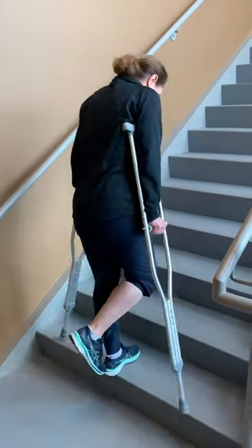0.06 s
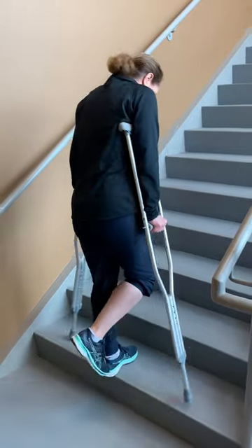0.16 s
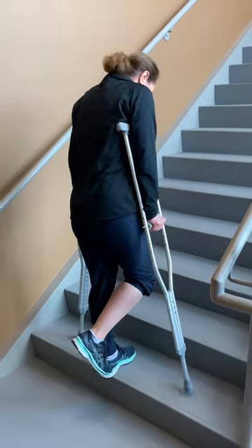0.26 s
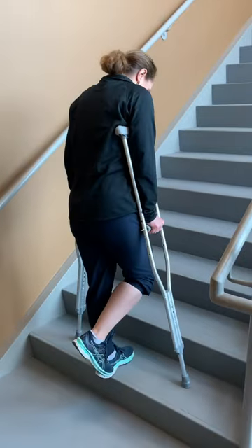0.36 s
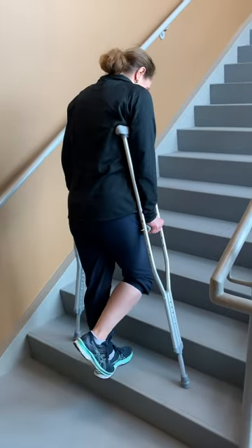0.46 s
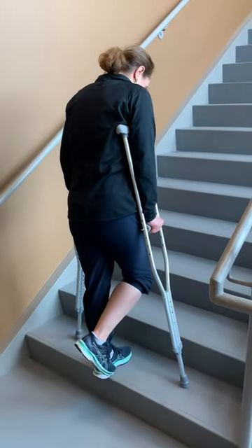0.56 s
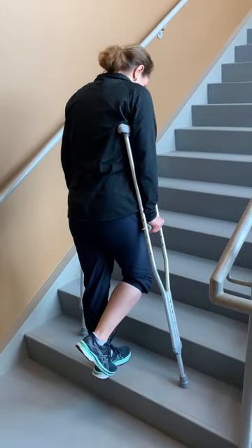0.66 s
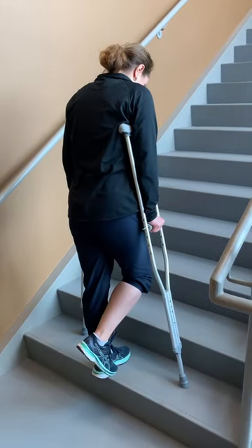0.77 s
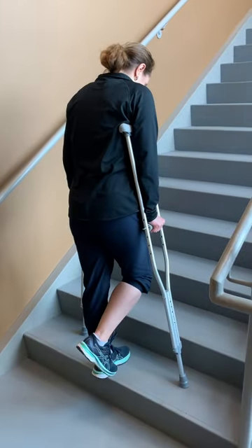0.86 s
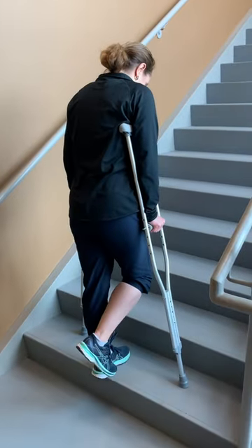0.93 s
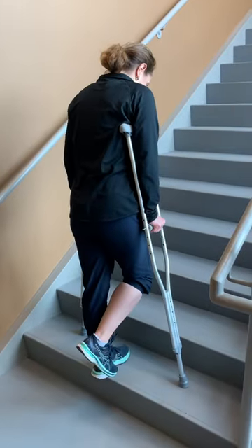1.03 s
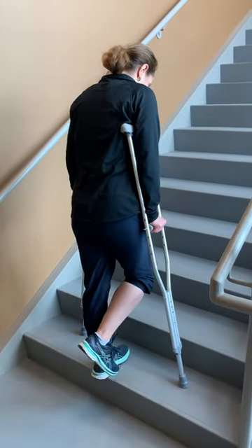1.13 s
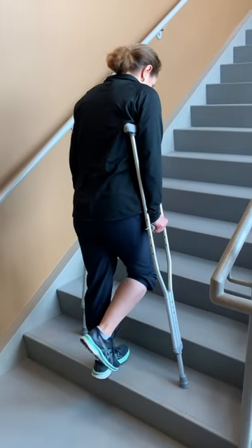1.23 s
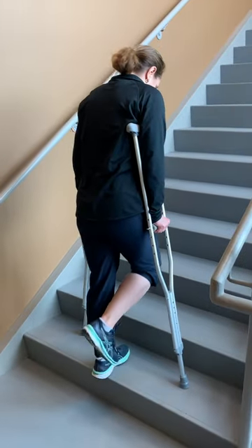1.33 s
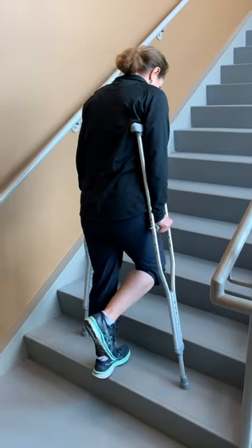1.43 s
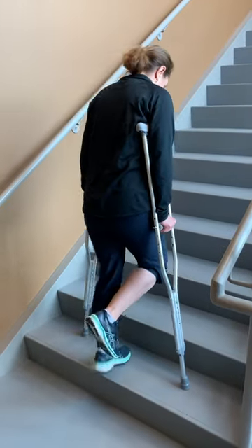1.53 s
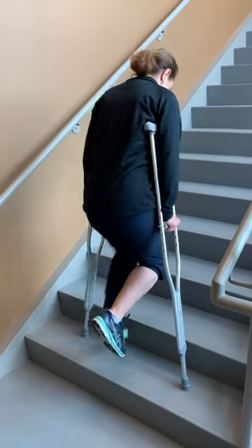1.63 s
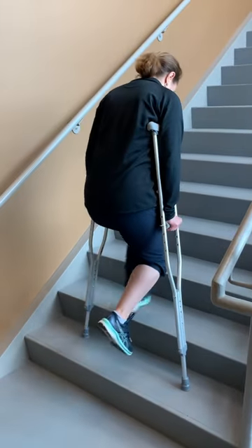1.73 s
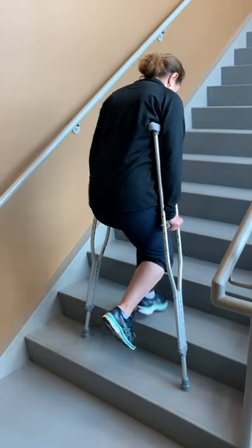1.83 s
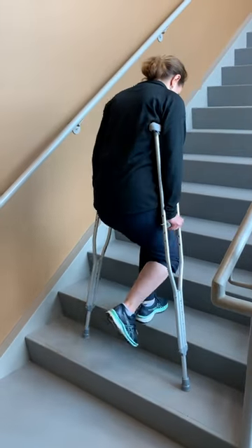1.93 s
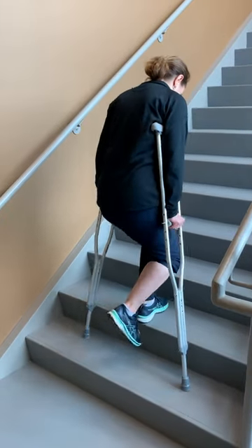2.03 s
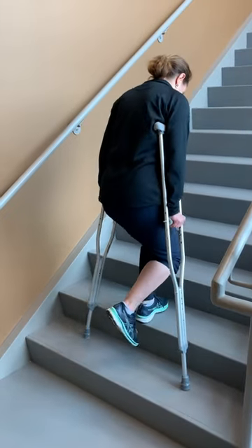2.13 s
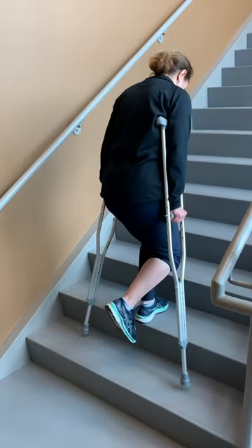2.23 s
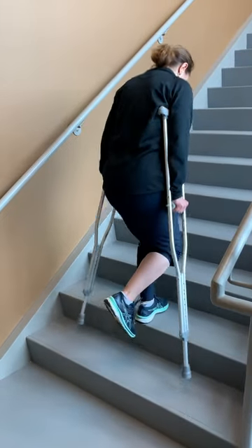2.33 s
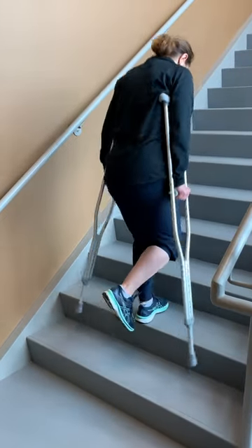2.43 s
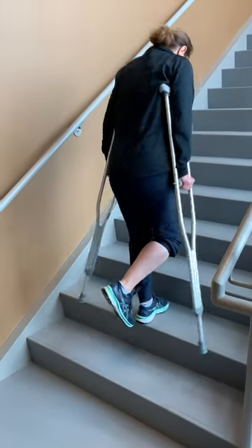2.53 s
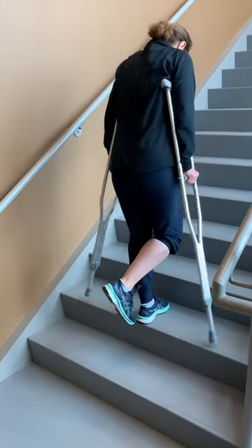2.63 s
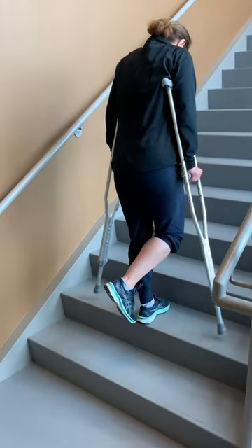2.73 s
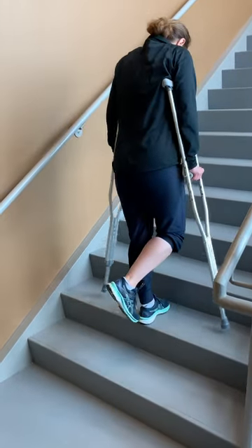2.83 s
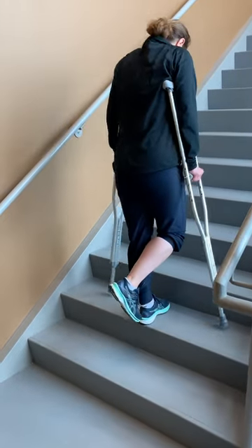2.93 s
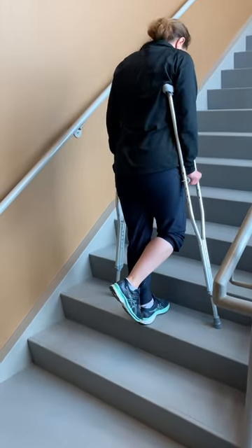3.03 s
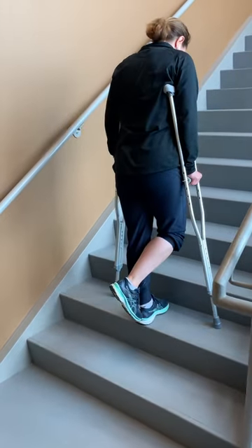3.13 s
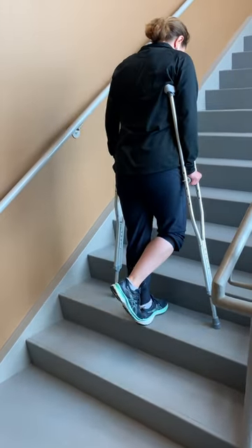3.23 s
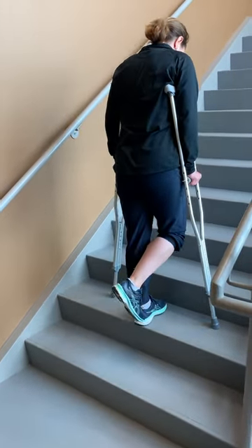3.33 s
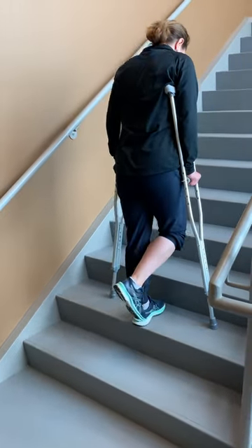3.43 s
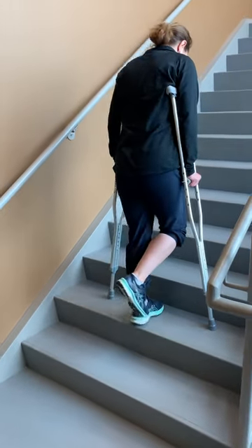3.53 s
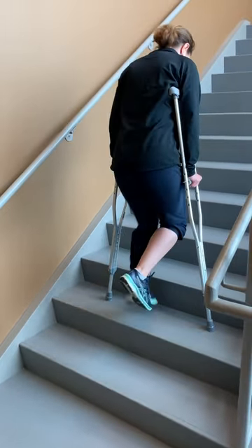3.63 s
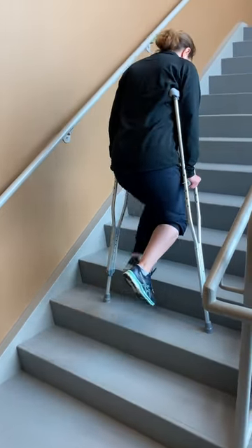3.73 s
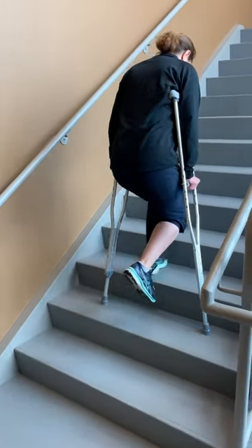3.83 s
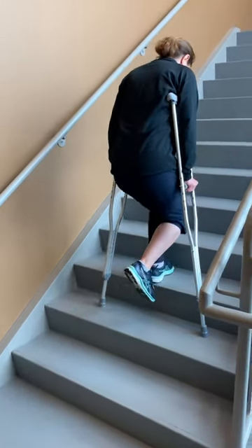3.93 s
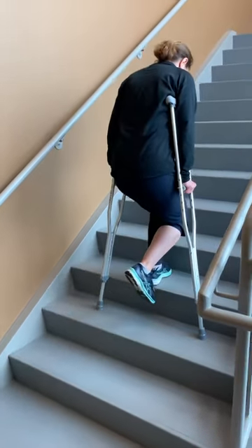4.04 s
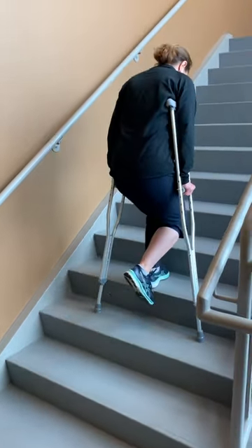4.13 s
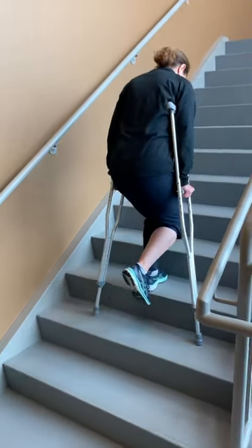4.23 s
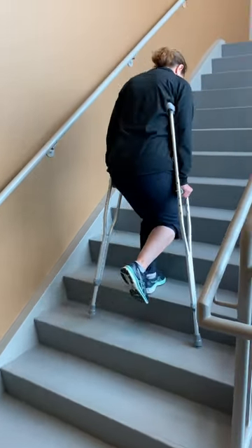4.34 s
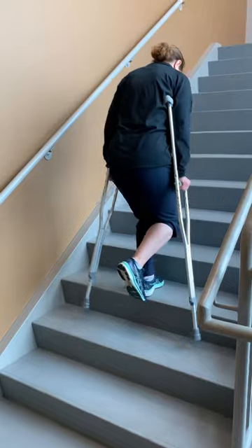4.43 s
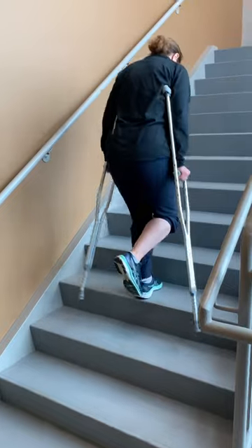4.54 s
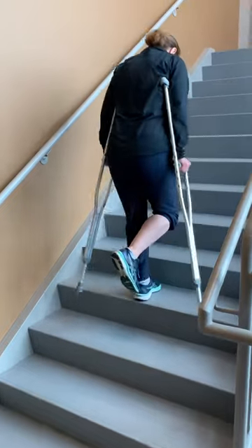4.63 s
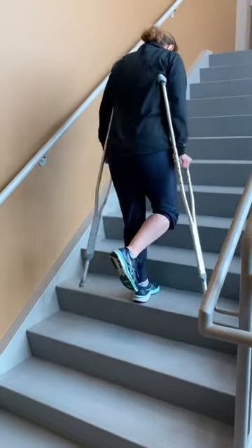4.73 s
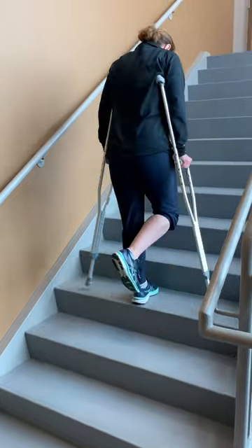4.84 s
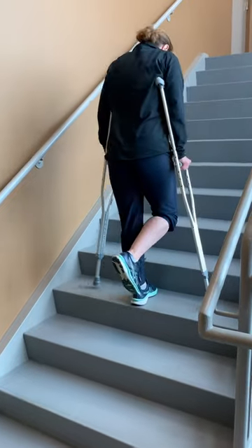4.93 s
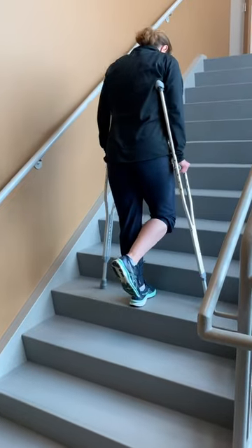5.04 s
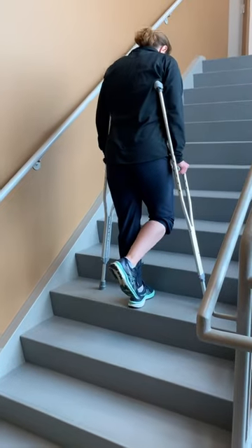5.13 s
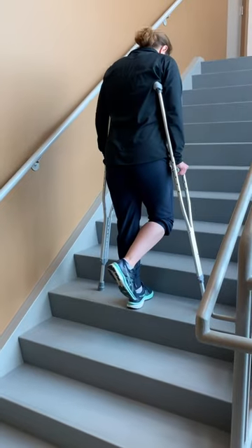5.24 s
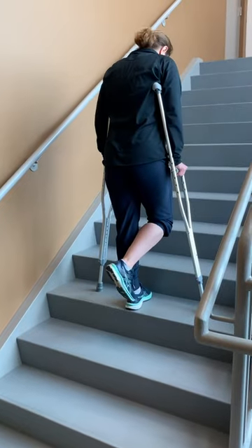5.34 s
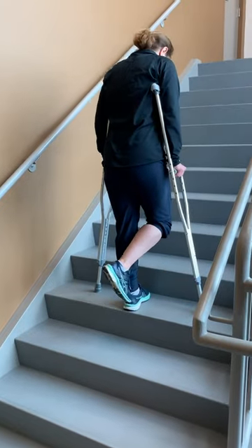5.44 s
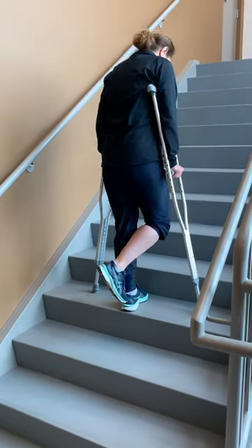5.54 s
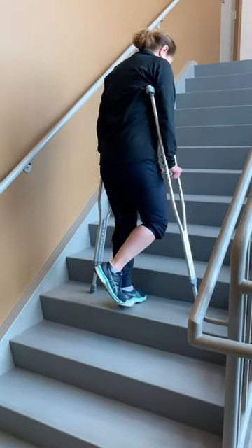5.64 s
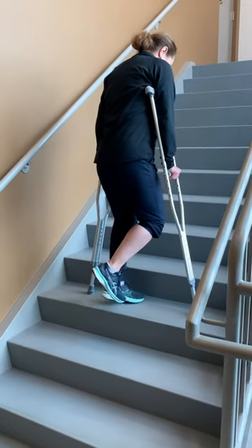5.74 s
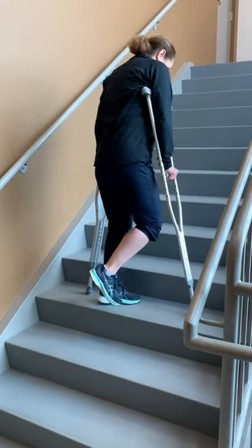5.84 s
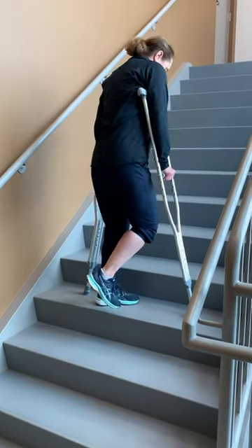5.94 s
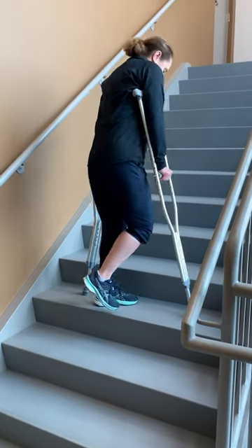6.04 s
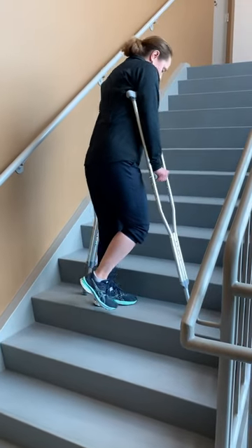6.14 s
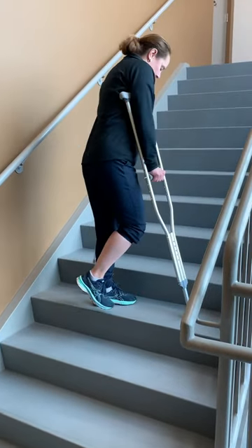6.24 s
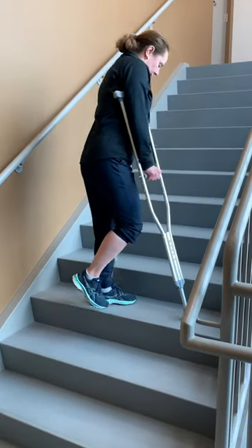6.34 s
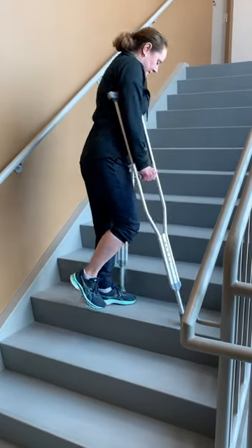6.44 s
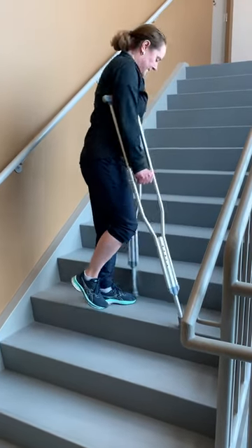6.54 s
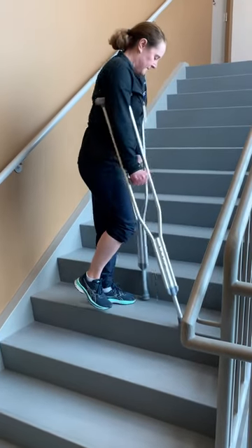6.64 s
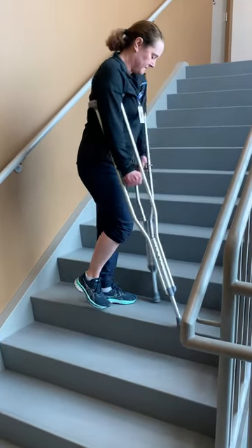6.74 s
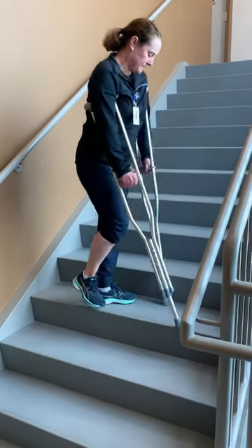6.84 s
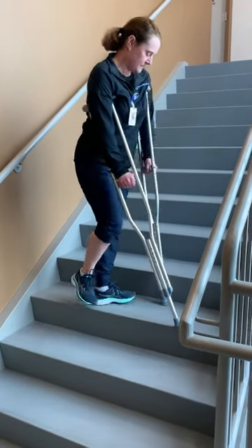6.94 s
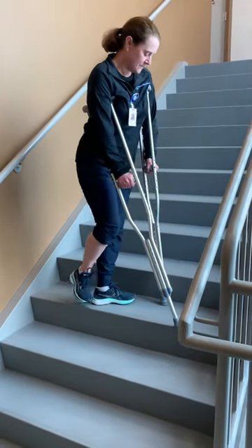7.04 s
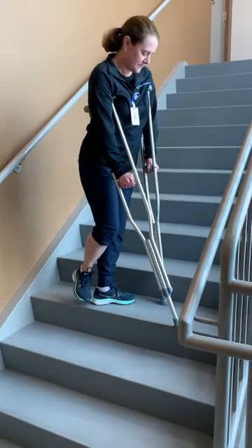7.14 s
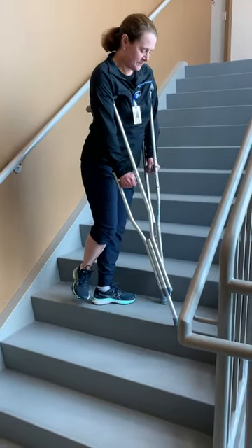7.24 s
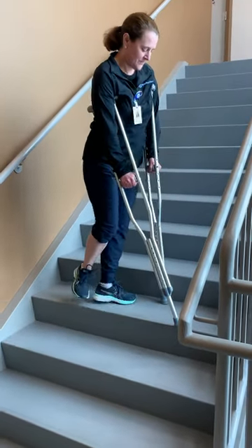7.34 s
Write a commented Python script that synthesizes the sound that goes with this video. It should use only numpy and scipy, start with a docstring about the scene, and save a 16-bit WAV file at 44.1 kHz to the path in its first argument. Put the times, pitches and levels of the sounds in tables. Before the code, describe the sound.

A bare, echoing indoor stairwell, heard in stereo from a few steps away. Low duct rumble, wavering fan hum and a very thin whine run throughout. At 0.25 to 0.37 seconds aluminium crutches plant with a bright double clack, tubes rattling and ringing over a knocked tread; small ticks follow until 0.7. After a quiet gap with a faint rub, a sneaker slaps down at 1.83 with a dull boom, and metal clicks follow to 2.16. Light rattles and a scuff come at 2.5, then a loud clack at 3.03. Another shoe slap and thud land at 3.9, clicks at 4.25, and the strongest sharp crutch clack at 5.04. Grainy rubber scrapes run from 5.5 to 5.75. A firm clack with a low tread thud and scrape hits at 6.35, smaller rattles follow to 6.83, and a soft scuff with a tiny tick ends it near 7.35.

```python
"""Metal clacks echo in a hard stairwell: a person climbs on two aluminium crutches, one step at a time.
The telescoping tubes click, rattle and ring as they are lifted, planted and loaded: noise bursts and sines.
Treads knock and boom under the weight; a sneaker slaps down, and rubber scrapes in grainy noise.
Behind it are the air noise and wavering tones of the ventilation, with a thin whine."""
import sys
import numpy as np
from scipy import signal
from scipy.fft import rfft, irfft, next_fast_len
from scipy.io import wavfile
from scipy.ndimage import map_coordinates

SR = 44100
rng = np.random.default_rng(int(sys.argv[2]) if len(sys.argv) > 2 else 0)


def wrap_up_sound(samples):
    """Save the sound to the file named by the first command line argument, as 16-bit audio."""
    columns = np.atleast_2d(samples).T
    # keep every value between -1 and 1, then stretch to whole-number steps
    tamed = np.clip(columns, -1, 1)
    steps = np.round(tamed * 32767).astype(np.int16)
    wavfile.write(sys.argv[1], SR, steps)


N = 325613


def crutches():
    """The pin clicks in its hole, the tubes rattle in each other and ring on, and the frame clanks."""
    # Clacks of the crutches: start_s, strength_db, then pin_click_db, tube_ring_db, frame_clank_db (added to
    # the strength, before the trims below), clank_pitch_hz, ring_pitch_hz, chatter_s, stairwell_db (added)
    clack_table = [(0.2494, -34.5, 8.5, -6, -1.5, 1500, 4400, 0.0027, 6),
                   (.361, -29, 16.5, -1.5, 1.5, 1540, 4250, 0.002, 0),
                   (.367, -29, 12, -7, -2, 1595, 4280, 0.0017, 3.5),
                   (.519, -51.5, 0, 0, 1, 1650, 4200, 0.0028, 3),
                   (.696, -42.5, 6.5, -4, 2, 1468, 4240, 0.0035, 2.5),
                   (.705, -46, 8, -14, 6, 1310, 4300, 0.0032, -2.5),
                   (1.2669, -53.5, 8, -21, 2.5, 1670, 4300, 0.0024, -8),
                   (1.4928, -59.5, 6, -6, 5.5, 1650, 4330, 0.0023, 2),
                   (1.527, -55.5, 12.5, -5, -2, 1670, 4100, 0.0038, 6),
                   (1.674, -56, 3, -9, 10, 1710, 4100, .003, 4),
                   (1.709, -47.5, 10.5, -9, -4, 1650, 4340, 0.0029, 0.5),
                   (1.8647, -42, 23, -20, 5.5, 1900, 4700, 0.0013, -1.5),
                   (1.9194, -35, 16.5, -13, -2.5, 1900, 4700, .0014, 0),
                   (2.1212, -50.5, -5, -5, -2, 1620, 4300, 0.0017, 3),
                   (2.139, -44, 14.5, 2, -5, 1620, 4370, 0.0022, -1.5),
                   (2.1574, -35.5, 19, -12.5, -9, 1655, 4630, .002, .5),
                   (2.5063, -56, 8, -9, -.5, 1620, 4300, 0.0016, 2),
                   (2.5312, -43.5, 3, -13, -0.5, 1540, 4300, 0.0039, 0.5),
                   (2.635, -60, -8, 3, -4.5, 1658, 4140, .0014, -5.5),
                   (3.0282, -28, 11, -6, -0.5, 1720, 4300, .003, -0.5),
                   (3.0356, -24.5, 16.5, -2, 4.5, 1710, 4350, .003, 1.5),
                   (3.496, -56.5, 5, -13, 8, 1620, 4300, .002, 6.5),
                   (3.7655, -65.5, 12.5, -14, 9, 1650, 4280, 0.0015, -7),
                   (4.2496, -39.5, 20.5, 1.5, -10, 1650, 4640, 0.0027, 1),
                   (4.3049, -43, 4.5, -1.5, -4.5, 1640, 4490, .003, 1),
                   (4.9878, -30.5, 14, -1.5, -3, 1620, 4180, 0.0017, 7.5),
                   (5.0426, -21.5, 14.5, -16, -2.5, 1880, 4400, 0.002, -0.5),
                   (5.5148, -59.5, 0.5, 9, 9.5, 1625, 4300, 0.0031, 10),
                   (6.089, -62.5, 6, -1.5, 5, 1660, 4340, 0.0018, 9.5),
                   (6.136, -51, -1.5, -4, -8, 1640, 4300, 0.0042, 4.5),
                   (6.2514, -48.5, -1.5, -3, -4, 1620, 4200, 0.0036, 4),
                   (6.3499, -27, 13, -2.5, 7, 1860, 4300, 0.0036, 3),
                   (6.5, -43.5, 13.5, -2, 1, 1900, 4300, 0.0028, 6.5),
                   (6.5254, -38.5, 6, 0.5, 4.5, 1610, 4230, 0.0057, 1.5),
                   (6.826, -39.5, 7, 5, 2.5, 1610, 4080, 0.0032, 2.5),
                   (7.3549, -55.5, 12, 4, 5, 1630, 4270, .003, 9)]
    # Pin in its hole: pitch_hz, relative_level_db
    click_spectrum = [(3000, -21), (6500, -9), (8000, 1), (9300, 1), (10500, -4), (12300, 0), (13500, 2.5),
                      (15200, -11.5), (16400, -28)]
    # Tubes rattling in each other: pitch_hz, relative_level_db
    rattle_spectrum = [(900, -28.5), (2000, -8.5), (3000, -3.5), (4200, 0.5), (5400, -3), (6900, -3.5),
                       (8500, -8.5), (13000, -26.5), (16000, -45)]
    # Ringing tubes: pitch_hz, relative_level_db, t60_s (time to fall by 60 dB)
    tube_modes = [(1182, -0.5, 0.19), (1660, -4, 0.3), (1858, 0, .2), (2330, -6.5, 0.38), (2700, -7.5, .15),
                  (4070, -2, .24), (4200, -6, .34), (4170, 0.5, 0.4), (4430, -3, 0.26), (4742, -9, .2),
                  (6500, -11.5, .12), (6960, -5, .14), (7900, -4, .12), (9600, -4.5, 0.12),
                  (10200, -7, .15), (10670, -1.5, 0.17), (12000, -5.5, 0.12)]
    # Crowded modes of the tube wall: multiple_of_ring_pitch, relative_level_db
    clink_spectrum = [(.6, -36.5), (.84, -17), (0.941, -4.5), (1, 0.5), (1.06, -1), (1.16, -13),
                      (1.3, -21.5), (1.6, -40)]
    # Clanking frame: multiple_of_clank_pitch, relative_level_db
    clank_spectrum = [(.12, -22.5), (0.302, -7.5), (0.481, -20), (0.621, -3.5), (.73, -3.5), (0.851, -4.5),
                      (1, 3.5), (1.16, -4), (1.3, -0.5), (1.55, -9.5), (1.9, -8.5), (3.5, -23.5)]
    usual_db = -38.5  # strength of an ordinary clack
    # A hard blow presses the tubes together, so the chatter stops sooner
    usual_damping_db_per_ms, damping_doubles_db = 3.5, 27.5

    out = np.zeros((2, N))
    for s, db, click_db, ring_db, clank_db, clank_hz, ring_hz, length, wet_db in clack_table:
        damping = usual_damping_db_per_ms * 2 ** ((db - usual_db) / damping_doubles_db)
        click = chatter(click_spectrum, damping, hold=length, rise=0.0023)
        click *= amp(db + click_db - 3.5)
        rattle = chatter(rattle_spectrum, damping, hold=length + 0.00017, rise=0.0055)
        rattle *= amp(db + 3.5)
        tubes = amp(db + ring_db - 23) * ring(tube_modes, detune=0.0022, attack=0.001)
        clink_hz = [(k * ring_hz, level) for k, level in clink_spectrum]
        clink = amp(db + ring_db - 4) * chatter(clink_hz, damping=1.1, hold=0.0045, rise=0.0021)
        clank_bands = [(k * clank_hz, level) for k, level in clank_spectrum]
        clank = amp(db + clank_db) * chatter(clank_bands, damping=2.18, hold=length, rise=0.0029)
        clack = click + rattle + clink + clank
        add(out, s, stairwell(clack + tubes, all_round(clack) + tubes, wet_db, near_db=2.0))
    return out


def treads():
    """Weight lands, then settles; each stage knocks a tread, sets it drumming and makes the flight boom."""
    # Rubber tips and the foot load the treads: start_s, boom_db, drum_db, drum_pitch_hz, knock_db,
    # knock_pitch_hz (levels before the trims below)
    thud_table = [(.251, -44, -52, 290, -46, 540), (.361, -36.5, -35.5, 244.6, -31, 526),
                  (1.833, -31, -48, 300, -36, 454), (1.838, -40, -45, 168, -32, 897),
                  (3.031, -44, -47, 330, -34, 400), (3.038, -32, -34.5, 238, -24.5, 580),
                  (3.045, -39, -49.5, 178, -24, 1020), (3.903, -34, -33, 170, -34, 438),
                  (3.907, -39, -35.5, 239, -36, 567), (4.992, -39, -42, 226, -43, 585),
                  (5.043, -35, -44, 349, -31, 536), (5.045, -36.5, -42, 226, -28, 773),
                  (6.352, -27.5, -29, 226, -37.5, 596), (6.41, -33.5, -35, 292.7, -54, 460),
                  (6.528, -35.5, -43, 225, -41.5, 617)]
    # Booming flight of stairs: pitch_hz, relative_level_db
    boom_spectrum = [(25, -32.5), (50, -17.5), (100, 0.5), (150, 0.5), (230, -6.5), (330, -4.5),
                     (500, -22.5), (1000, -32.5), (3000, -64)]
    # Knocked tread: multiple_of_knock_pitch, relative_level_db, t60_s
    knock_modes = [(.619, -6, .06), (.801, -2.5, .04), (1, 3, 0.035), (1.13, -5.5, 0.041), (1.36, -4, .04),
                   (1.7, -4, 0.023)]
    # Tread drumming under a load: multiple_of_drum_pitch, relative_level_db, t60_s
    drum_modes = [(1, 2.5, .2), (1.17, -8.5, .16)]
    # Each stage: delay in s, change of boom and drum in dB, change of knock in dB
    touch = (0, 0, 0)
    settling = (0.033, -1.5, -12.5)  # the full weight follows the first touch

    out = np.zeros((2, N))
    for s, boom_db, drum_db, drum_hz, knock_db, knock_hz in thud_table:
        knock_pitches = [(k * knock_hz, db, t60) for k, db, t60 in knock_modes]
        drum_pitches = [(k * drum_hz, db, t60) for k, db, t60 in drum_modes]
        for delay, more_boom_db, more_knock_db in [touch, settling]:
            boom = chatter(boom_spectrum, damping=0.34, hold=0.0055, spiky_db=0.5)
            boom *= amp(boom_db + more_boom_db - 10)
            knock = ring(knock_pitches, detune=0.037, attack=0.00066)
            knock *= amp(knock_db + more_knock_db - 2.5)
            drum = ring(drum_pitches, detune=0.013, attack=0.0067)
            drum *= amp(drum_db + more_boom_db - 6.5)
            thud = boom + knock + drum
            add(out, s + delay, stairwell(thud, thud, wet_db=-3.0, near_db=-6.0))
    return out


def sneaker():
    """The soft sole lands with a short, dull slap and a hollow ring."""
    # The sole slaps down, ball first and sometimes the heel after it: start_s, slap_db, pop_db,
    # pop_pitch_hz (levels before the trims below)
    landing_table = [(1.8309, -25, -36, 3300), (1.888, -36.5, -53.5, 2080), (3.902, -25, -33.5, 2800)]
    # Slapping sole: pitch_hz, relative_level_db
    sole_spectrum = [(120, 7), (300, -3.5), (500, 6.5), (800, -10), (1200, 2), (1600, -5), (1950, 0.5),
                     (2400, 1), (2900, -2), (3500, -7.5), (4300, -5), (6000, -18.5), (9000, -29),
                     (15000, -44)]
    # Hollow ring at each landing: multiple_of_pop_pitch, relative_level_db
    pop_spectrum = [(.4, -33), (.72, -27), (.88, -0.5), (1, -5.5), (1.07, -1), (1.16, -21), (1.8, -41)]

    out = np.zeros((2, N))
    for s, db, pop_db, pop_hz in landing_table:
        slap = amp(db + 3) * chatter(sole_spectrum, damping=1.92, hold=0.0012)
        pop_bands = [(k * pop_hz, level) for k, level in pop_spectrum]
        pop = amp(pop_db - 5) * chatter(pop_bands, damping=0.27, hold=0.004)
        add(out, s, stairwell(slap + pop, all_round(slap) + pop, wet_db=-2.0, near_db=-3.0))
    return out


def rubs():
    """Rubber dragged over a tread catches and slips: an uneven, grainy scrape that swells and fades."""
    # Sole and rubber tips rub on the treads: start_s, swell_s, fade_s, level_db (before the trim below),
    # brightness_db_per_octave
    rub_table = [(1.5, 0.056, 0.056, -54, 1), (2.505, 0.03, 0.035, -47, -5), (3.013, 0.017, .02, -42, -1.5),
                 (3.549, 0.041, 0.057, -55.5, 1.5), (5.517, 0.02, 0.085, -49.5, -2),
                 (5.611, 0.06, 0.1, -41, 0), (5.66, .012, .03, -52, 0), (5.72, 0.043, 0.045, -45.5, 0.5),
                 (6.334, 0.013, 0.1, -37.5, -2), (7.317, 0.063, .1, -43.5, 0.5)]
    # Rubbing rubber before the brightness tilt: pitch_hz, relative_level_db
    rub_spectrum = [(250, -19), (700, -9), (1200, -3), (2000, 1), (3200, 0.5), (4000, 2.5), (4700, 0),
                    (5600, -8.5), (7500, -11.5), (11000, -9.5), (15000, -15.5)]
    pivot_hz = 3000  # the tilt leaves this pitch alone

    out = np.zeros((2, N))
    unevenness_db = 3.2 * wobble(1200) + 2.8 * wobble(110)
    grains = unit(rng.standard_normal(N) * amp(unevenness_db))
    for s, swell, fade, db, tilt_db in rub_table:
        stroke = np.interp(seconds(swell + fade), [0, swell, swell + fade], [0, 1, 0])
        tilted = [(hz, level + tilt_db * np.log2(hz / pivot_hz)) for hz, level in rub_spectrum]
        own_grains = np.roll(grains, -round(s * SR))[:len(stroke)]
        scrape = signal.fftconvolve(amp(db - 5) * stroke * own_grains, impulse(tilted))
        add(out, s, stairwell(scrape, scrape, wet_db=-1.5, near_db=1.5))
    return out


def ventilation():
    """Air rumbles in the ducts under wavering fan tones and a thin whine."""
    # Air in the ducts: pitch_hz, relative_level_db
    air_spectrum = [(22, -28), (38, -18), (50, -2.5), (80, -3), (115, 0.5), (190, -11), (270, -7.5),
                    (400, -18), (700, -24.5), (1000, -24), (2000, -32.5), (4500, -43), (7500, -55),
                    (12000, -54.5), (15000, -76)]
    # Fan tones: pitch_hz, level_db (relative to the hum level)
    fan_tones = [(59.7, 0.5), (119.4, -10), (179.1, -21.5), (261.5, -11)]
    # The hum dips briefly: middle_s, depth_db
    dip_table = [(.7, 5), (3.72, 2.5), (6.15, 10)]
    # Level of the whine before its wobble: time_s, level_db
    whine_levels = [(0, -70), (.75, -62.5), (1.05, -60), (1.45, -61), (1.7, -67), (2.5, -62), (3.8, -63),
                    (4.2, -68.5), (4.9, -64.5), (7.38, -62.5)]
    steady_hum_db, dip_half_width_s, whine_hz = -47, 0.17, 1626

    t = np.arange(N) / SR
    air = unit(filtered(diffuse(N), lambda hz: amp(along(air_spectrum, hz))))
    air *= amp(-46.5 + 0.21 * wobble(3.6))

    hum = np.zeros(N)
    for hz, db in fan_tones:
        tone = np.sin(2 * np.pi * hz * t + 0.95 * wobble(8))
        hum += amp(db + 2 * wobble(14)) * np.sqrt(2) * tone
    dips_db = sum(depth_db * np.exp(-((t - s) / dip_half_width_s) ** 2) for s, depth_db in dip_table)
    hum *= amp(steady_hum_db - dips_db)

    whine_phase = 2 * np.pi * whine_hz * t + 0.6 * wobble(9)
    whine_gain = amp(curve(whine_levels) + 1.8 * wobble(7))
    whine = whine_gain * np.sin([whine_phase, whine_phase + 1.84])  # right side is shifted in phase
    return air + hum * amp([[0.4], [-0.4]]) + whine


def stairwell(x, far, wet_db, near_db):
    """x plus scatter off nearby steps and single wall echoes; far goes up the shaft and rings on there."""
    # How long the stairwell rings: pitch_hz, t60_s
    decay_times = [(120, 2.8), (250, 0.61), (500, 0.87), (1100, 0.86), (1800, 0.9), (2800, 0.73),
                   (4300, 0.76), (5500, 0.7), (8000, 0.34), (12000, 0.34), (14000, 0.29)]
    # How loudly it rings, before wet_db is added: pitch_hz, level_db
    wet_levels = [(100, 9), (300, 8), (700, 3), (1500, -1.5), (4000, -3.5), (8000, -5.5), (12200, -7.5),
                  (13800, -26)]
    # What nearby surfaces give back, before near_db is added: pitch_hz, level_db
    wall_levels = [(300, 2.5), (5000, -0.5), (12000, -3), (13800, -9.5), (16000, -15.5)]
    # Single echoes off the walls and the flight above; later ones are weaker
    echo_from_s, echo_to_s, echo_db, echo_fade_db_per_s = 0.007, 0.07, -12, 169

    # The tail is noise that dies away at its own speed in each band
    t = seconds(0.9)
    hz, when, z = signal.stft(diffuse(len(t)), SR, nperseg=256)
    t60 = along(decay_times, hz)[:, None]
    gain = amp(along(wet_levels, hz)[:, None] + wet_db - 60 * when / t60)
    gain *= np.sqrt(2 * np.log(1000) / (t60 * SR))  # long and short decays carry equal energy
    tail = signal.istft(z * gain, SR, nperseg=256)[1][:, :len(t)]
    tail *= 1 - np.exp(-t / 0.006)

    early = seconds(0.1)
    near = diffuse(len(early)) * amp(-60 * early / 0.11) * (1 - np.exp(-early / 0.0017))
    near *= amp(-0.5) / np.linalg.norm(near[0])
    for place, lag in rng.random(size=(7, 2)):
        delay = echo_from_s + place * (echo_to_s - echo_from_s)
        echo = amp([echo_db - echo_fade_db_per_s * delay])
        for channel, offset in zip(near, [0.5 - lag, lag - 0.5]):
            add(channel, delay + 0.00019 * offset, echo)  # a tiny time gap between the ears
    near = amp(near_db) * filtered(near, lambda hz: amp(along(wall_levels, hz)))
    near[:, 0] += 1  # the direct path
    out = signal.fftconvolve(far[None], tail, axes=1)
    add(out, 0, signal.fftconvolve(x[None], near, axes=1))
    return out


def all_round(x):
    """What a blow radiates in all directions together: its spectral peaks and notches even out."""
    spread = 1.08  # frequency ratio to average over, up and down
    hz = np.geomspace(100, 19000, 120)
    bins = np.fft.rfftfreq(len(x), 1 / SR)
    energy_so_far = np.cumsum(np.abs(rfft(x)) ** 2)
    below = lambda edge: np.interp(edge, bins, energy_so_far)
    power = (below(hz * spread) - below(hz / spread)) / hz
    smooth = np.c_[hz, 10 * np.log10(power + 1e-20)]
    return np.linalg.norm(x) * impulse(smooth, size=len(x))


def chatter(spectrum, damping, hold, spiky_db=3.0, rise=0.0013):
    """A burst of tiny uneven contacts that lasts hold seconds, then dies by damping dB per ms."""
    t = seconds(0.35)
    ms = 1000 * np.maximum(t - hold, 0)
    noise, sizes = rng.standard_normal((2, len(t)))
    envelope = amp(-max(damping, 0.3) * ms) * (1 - np.exp(-t / rise))
    force = rfft(noise * amp(spiky_db * sizes) * envelope)
    # hard contacts excite all frequencies about evenly: the colour comes from the struck body
    even = irfft(force / np.sqrt(np.abs(force) + 1e-12), len(t)) * envelope ** 0.2
    burst = signal.fftconvolve(even, impulse(spectrum))[:len(t)]
    return burst * np.linalg.norm(envelope) / np.linalg.norm(burst)


def ring(modes, detune, attack):
    """Decaying modes, struck at slightly new strengths and pitches each time."""
    t = seconds(0.35)
    hz, db, t60 = np.transpose(modes)[:, :, None]
    strength, pitch, phase = rng.standard_normal((3, len(modes), 1))
    waves = np.sin(2 * np.pi * (hz * (1 + detune * pitch) * t + phase))
    fading = amp(db + 2 * strength - 60 * t / t60)
    return np.sum(fading * waves, axis=0) * (1 - np.exp(-t / attack))


def diffuse(size):
    """Stereo noise arriving from all sides: alike in the bass, nearly unrelated in the high treble."""
    # Diffuse sound: pitch_hz, left_right_likeness (1 same, 0 unrelated, -1 opposite)
    likeness = [(60, 0.79), (150, 0.95), (280, 0.83), (450, 0.44), (650, -0.26), (1300, 0.45),
                (2500, 0.032), (6000, 0.0068)]
    turn = lambda hz: np.arccos(np.clip(along(likeness, hz), -1, 1)) / 2
    mid_and_side = lambda hz: np.array([np.cos(turn(hz)), np.sin(turn(hz))])
    mid, side = filtered(rng.standard_normal((2, size)), mid_and_side)
    return np.array([mid + side, mid - side])


def impulse(spectrum, size=1024):
    """The causal impulse of energy 1 that has this spectrum."""
    cepstrum = irfft(np.log(amp(along(spectrum, np.fft.rfftfreq(size, 1 / SR)))))
    # fold the second half onto the first, so that the energy comes as early as possible
    cepstrum[1:size // 2] *= 2
    cepstrum[size // 2:] = 0
    h = irfft(np.exp(rfft(cepstrum)))
    return h / np.linalg.norm(h)


def filtered(x, response):
    """x times a complex response of frequency."""
    n = x.shape[-1]
    m = next_fast_len(n + 4096, True)
    return irfft(rfft(x, m) * response(np.fft.rfftfreq(m, 1 / SR)), m)[..., :n]


def wobble(rate):
    """A smooth random curve, rate knots a second."""
    knots = rng.standard_normal(int(N * rate / SR) + 4)
    return map_coordinates(knots, [np.arange(N) * rate / SR])


def curve(rows):
    """(s, value) rows as one value per sample."""
    return np.interp(np.arange(N) / SR, *np.transpose(rows))


def along(points, hz):
    """(Hz, value) points read off on a log frequency axis."""
    f, v = np.transpose(points)
    return np.interp(np.log(hz + 1), np.log(f), v)


def add(track, s, x):
    """Mix x into the track from time s on."""
    part = track[..., max(round(s * SR), 0):][..., :x.shape[-1]]
    part += x[..., :part.shape[-1]]


def seconds(length):
    """Sample times in s, from 0 up to length."""
    return np.arange(int(length * SR)) / SR


def amp(db):
    """Decibels as an amplitude factor."""
    return 10 ** (np.asarray(db) / 20)


def unit(x):
    """x scaled to an average (RMS) level of 1."""
    return x / np.sqrt(np.mean(x ** 2) + 1e-20)


def scene():
    """The climber, a little to the right, over the ventilation."""
    climber = crutches() + treads() + sneaker() + rubs()
    return climber * amp([[-0.5], [0.5]]) + ventilation()


def record(dry):
    """The recorder widens the treble: the right mixes in the left, its phase turning with frequency."""
    top_hz = 16800  # nothing passes above this
    blend = lambda hz: np.pi / 2 * np.clip((hz - 5300) / 2900, 0, 0.88)
    angle = lambda hz: 2 * np.pi * (hz - 6200) / 4700
    turn = lambda hz: np.exp(1j * (angle(hz) - 0.3 * np.sin(2 * angle(hz))))  # turns in soft steps
    left, right = dry
    own = filtered(right, lambda hz: np.cos(blend(hz)))
    shared = filtered(left, lambda hz: np.sin(blend(hz)) * turn(hz))
    return filtered(np.array([left, own + shared]), lambda hz: np.clip((top_hz - hz) / 600, 0, 1))


dry = scene()
out = record(dry)
wrap_up_sound(out)
```